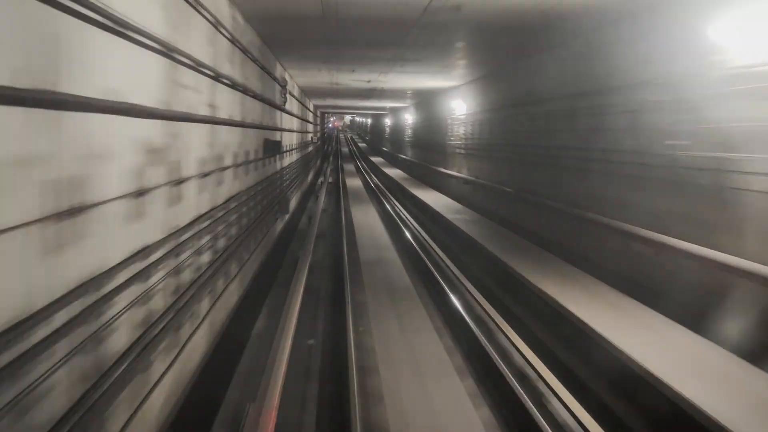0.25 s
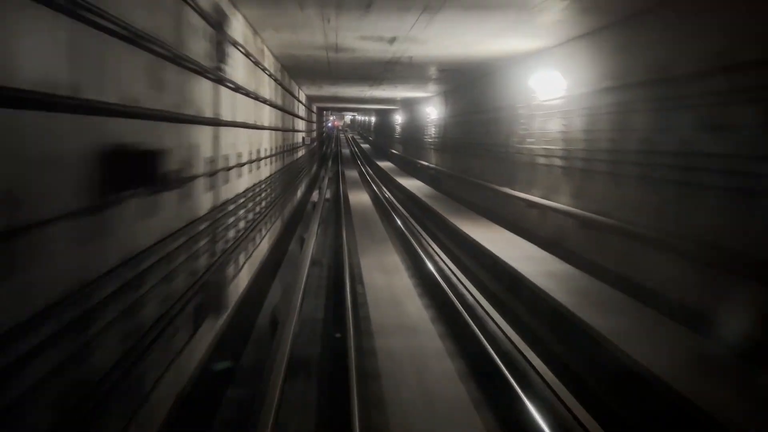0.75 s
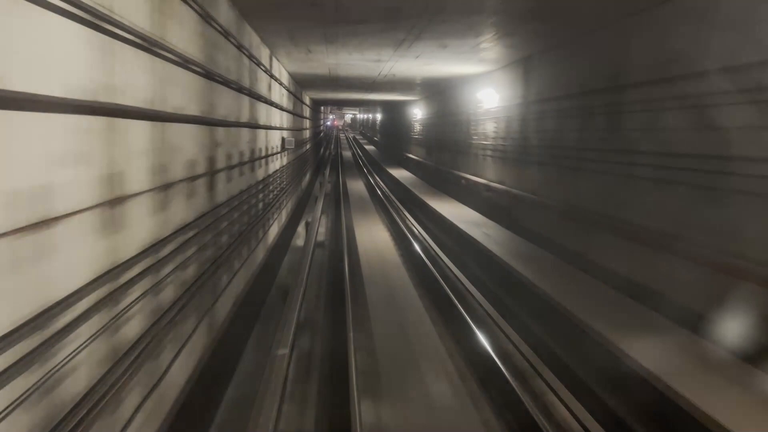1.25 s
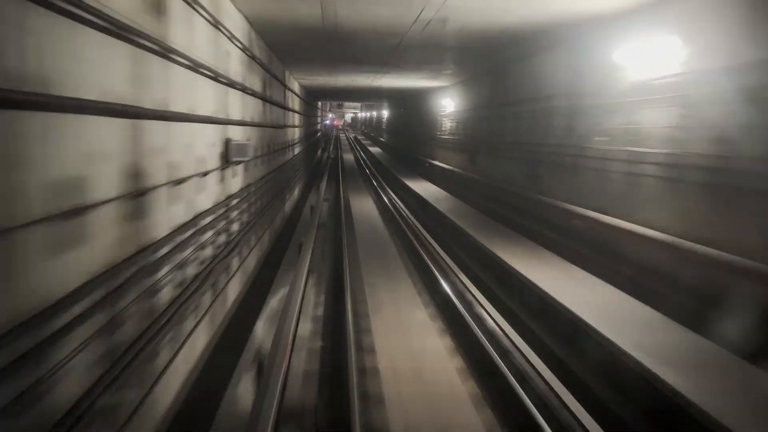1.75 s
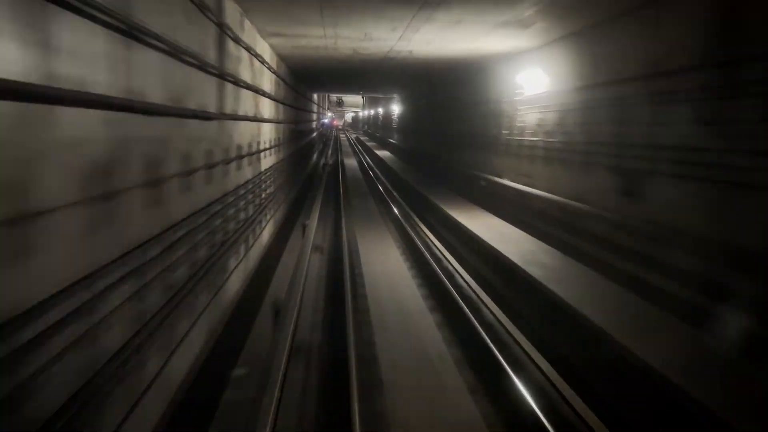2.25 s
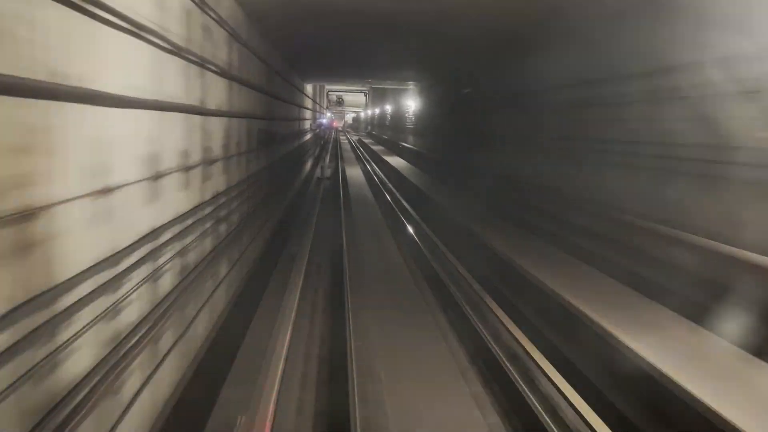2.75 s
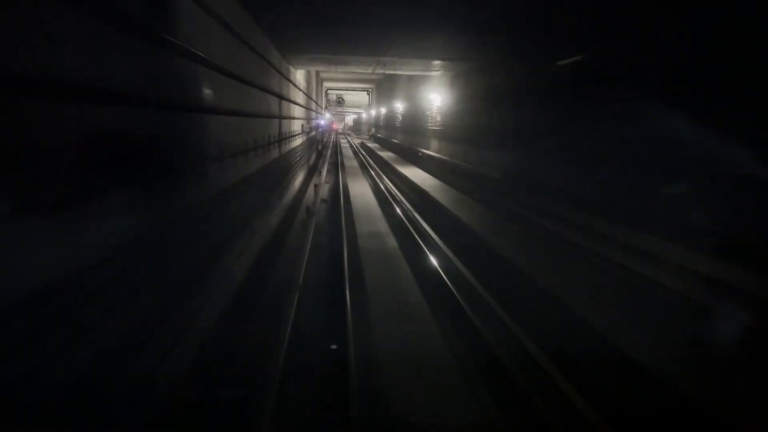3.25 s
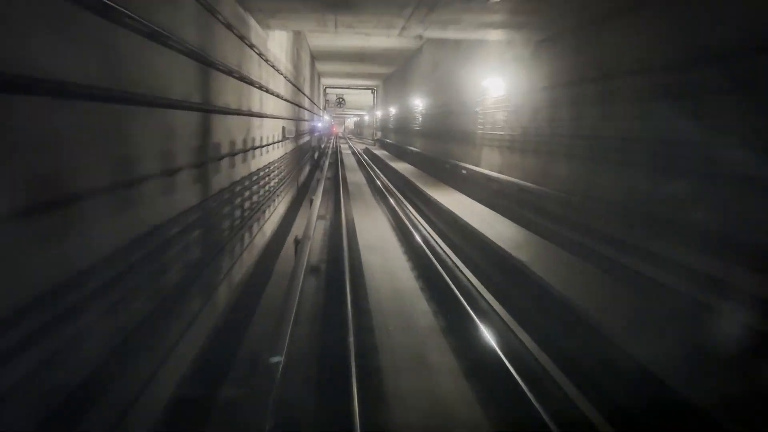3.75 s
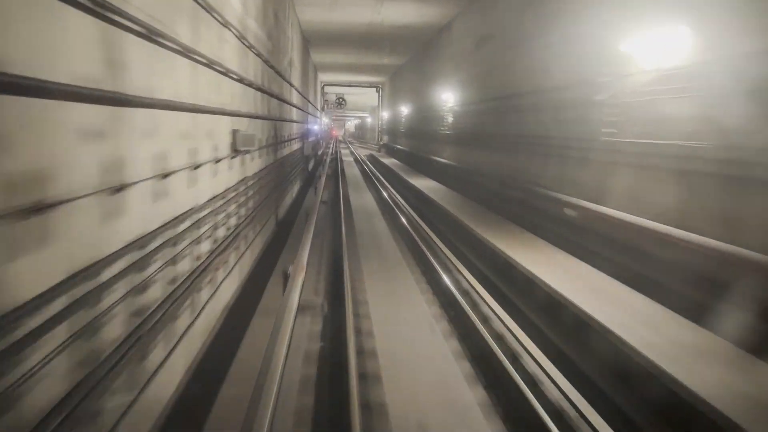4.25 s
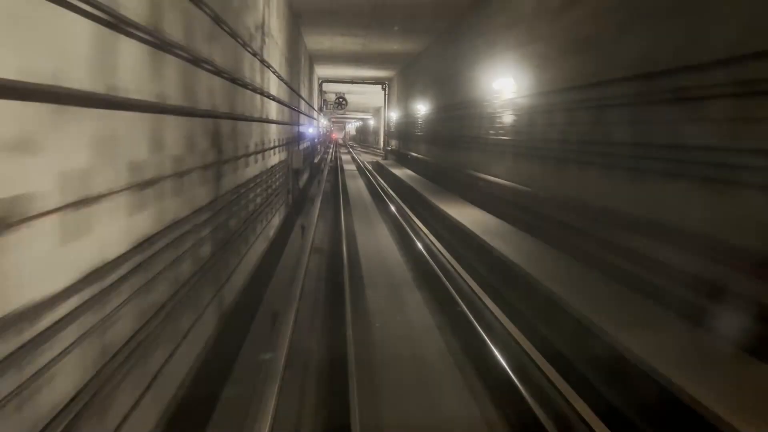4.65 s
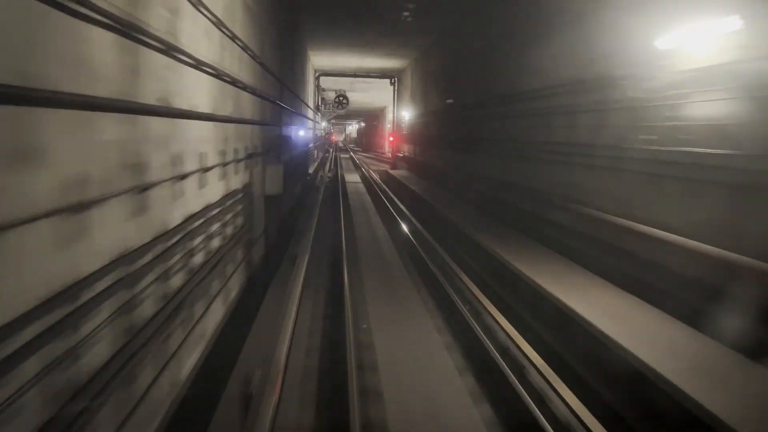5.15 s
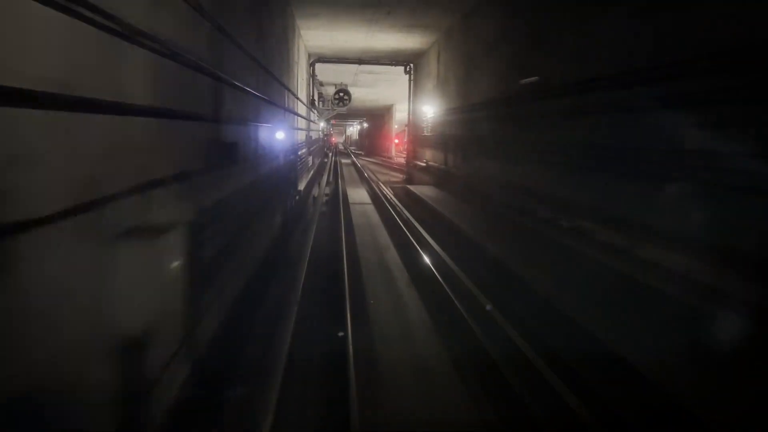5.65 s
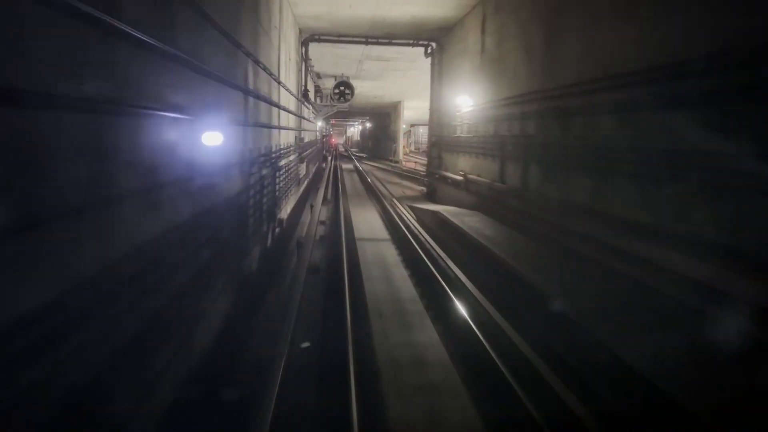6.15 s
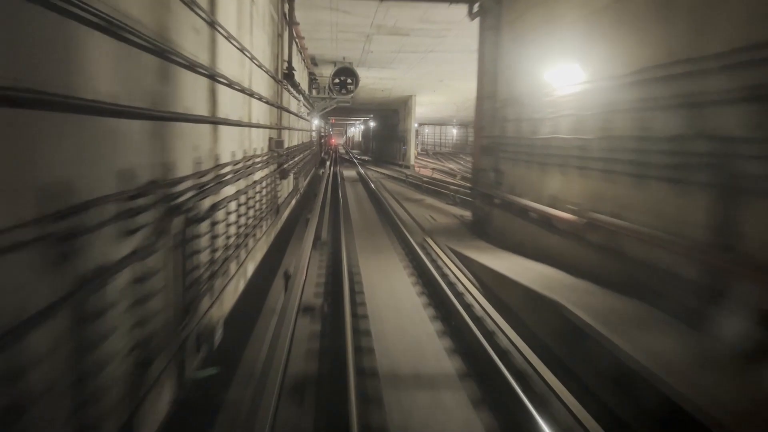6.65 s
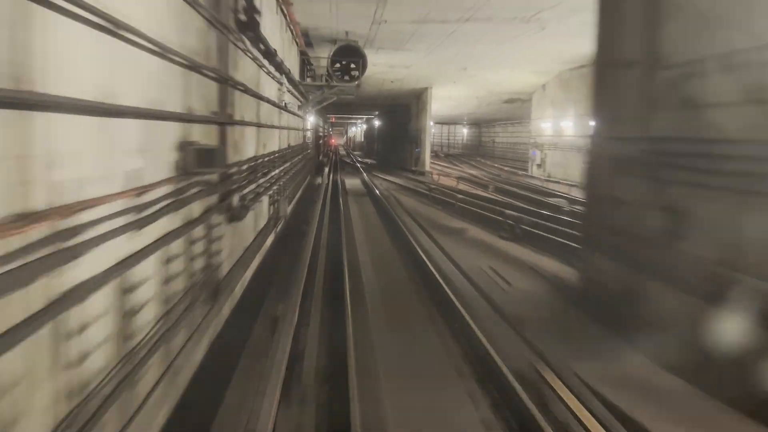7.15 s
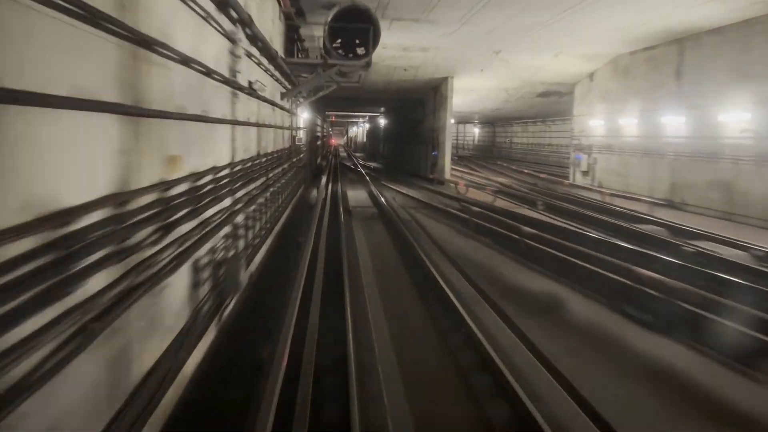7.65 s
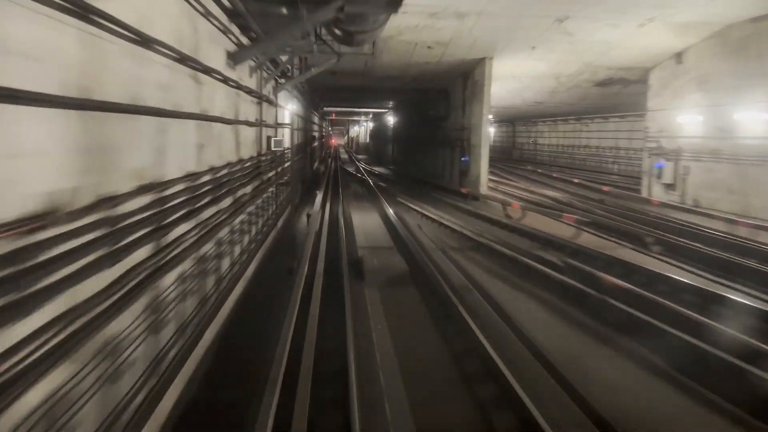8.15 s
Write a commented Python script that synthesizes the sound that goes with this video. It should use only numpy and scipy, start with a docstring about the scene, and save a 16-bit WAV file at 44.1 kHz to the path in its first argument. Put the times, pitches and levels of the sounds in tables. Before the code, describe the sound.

Inside a speeding subway cab, low rumbling and a wobbling wheel howl continue over hum and rushing air, sinking slightly near a junction.

```python
"""First comes a metro train's low rumble, wheel roar and hissing air, heard from the front cab in a tunnel.
Over it the wheels howl on rippled rail: a wavering note and a noisy band, sinking as the train slows.
A fan hums, two inverters whine and beat slowly, a motor tone comes and goes and the wheels ring in scrubs.
Bumps set off rattles and latch ticks, rough track knocks the body, and late on a cab panel sings.
Noise is shaped by spectra; notes are oscillators; ringing parts are narrow bands of random flutter."""
import sys
import numpy as np
from scipy import signal
from scipy.fft import rfft, irfft
from scipy.io import wavfile
from scipy.ndimage import uniform_filter1d

SR = 44100
rng = np.random.default_rng(int(sys.argv[2]) if len(sys.argv) > 2 else 0)


def dump_mix(stems):
    """Bounce the given channels to the path in sys.argv[1] as a 16-bit WAV at rate SR."""
    frames = np.atleast_2d(stems).T  # one column per channel
    limited = np.clip(frames, -1, 1)  # hard clip at full scale
    pcm = np.round(limited * 32767).astype(np.int16)
    wavfile.write(sys.argv[1], SR, pcm)


N = 370440
TIME = np.arange(N) / SR
FRAME, HOP = 4096, 1024  # samples, for noise built from spectrum frames
BINS = np.fft.rfftfreq(FRAME, 1 / SR)
FRAME_TIMES = np.arange(N // HOP + 3) * HOP / SR


def amp(db):
    """Decibels to gain."""
    return 10 ** (np.asarray(db) / 20)


def evened(x):
    """Scales to unit rms."""
    return x / np.sqrt(np.mean(abs(x) ** 2) + 1e-20)


def read(points, hz):
    """A spectrum's value, interpolated on a log-frequency axis."""
    f, value = np.transpose(points)
    return np.interp(np.log(hz + 1), np.log(f + 1), value)


def curve(rows, t=TIME):
    """The columns of a table as functions of time."""
    s, *columns = np.transpose(rows)
    return [np.interp(t, s, column) for column in columns]


def swell(s, half_length, t=TIME):
    """A smooth bell in time, peaking at one."""
    return np.exp(-((t - s) / half_length) ** 2)


def struck(s, rise, t60):
    """The envelope of one blow: a soft onset and an exponential decay."""
    age = np.maximum(TIME - s, 0)
    return amp(-60 * age / t60) * (1 - np.exp(-age / rise))


def flutter(width_hz, order=2):
    """Slow complex chance of unit rms: the envelope of a resonance driven by noise."""
    f = np.fft.fftfreq(N, 1 / SR)
    z = rng.standard_normal(N) + 1j * rng.standard_normal(N)
    lowpass = 1 / np.sqrt(1 + (2 * f / width_hz) ** (2 * order))
    return evened(np.fft.ifft(z * lowpass))


def ringing(modes):
    """Resonances kept sounding by random forces, at unit rms together."""
    total = 0
    for hz, width, db in modes:
        carrier = np.exp(2j * np.pi * hz * TIME)
        total = total + amp(db) * (flutter(width) * carrier).real
    return evened(total)


def lifts(modes, hz):
    """The dB that a set of resonances adds to a spectrum."""
    return sum(db / (1 + (2 * (hz - f) / width) ** 2) for f, width, db in modes)


# train speed: (time [s], speed [share of top speed])
TRAIN_SPEED = [(0, .988), (1.8, .995), (3.4, .992), (5, .948), (6, .91), (7, .875), (8.4, .83)]


def by_speed(top_db, slope_db):
    """Gain over time of a noise that grows as a power of the speed."""
    return amp(top_db + slope_db * np.log10(curve(TRAIN_SPEED)[0]))


# rumble spectrum, before levelling: (frequency [Hz], relative level [dB per Hz])
RUMBLE_SPECTRUM = [(15, -36.5), (30, -14.5), (46, 2.5), (56, -0.5), (68, -4), (90, -2), (118, 2),
                   (160, -2.5), (220, -3), (285, -10), (400, -13), (900, -81.5)]
# rumble growth: (level at top speed [dB], slope [dB per tenfold speed])
RUMBLE_GROWTH = (-29.5, 16)


def rumble(apart_db=-22):
    """Long waves from the floor reach both ports almost alike."""
    noise = rng.standard_normal((2, N))
    colour = amp(read(RUMBLE_SPECTRUM, np.fft.rfftfreq(N, 1 / SR)))
    shared, apart = irfft(rfft(noise) * colour, N)
    apart = amp(apart_db) * evened(np.gradient(apart))  # shorter waves differ more between the ports
    return by_speed(*RUMBLE_GROWTH) * (evened(shared) + np.array([apart, -apart]))


# match of left and right, clipped to -1..1: (frequency [Hz], correlation)
PORT_LIKENESS = [(330, 0.9), (400, 0.83), (475, 1.33), (545, 0.35), (580, 0.02), (615, 0.1), (665, 0.5),
                 (700, 0.94), (770, 0.15), (850, .25), (900, 0.56), (1020, 1.09), (1240, 0.74),
                 (1300, 0.28), (1600, 0.14), (1900, 0.25), (2100, 0.2), (2250, .2), (2700, 0.85),
                 (3300, -0.2), (6000, 0.26), (10000, 0.9)]
# phase by which left leads right: (frequency [Hz], lead [radians])
PORT_LEAD = [(500, 0.34), (590, -0.5), (635, 1.2), (710, 0), (810, 2.5), (930, 2.5), (1050, 2.5), (1380, 3),
             (1480, .1), (2200, 0), (2500, 1.5), (3000, 0.45), (7000, 1.5)]
# left minus right: (frequency [Hz], difference [dB])
PORT_BALANCE = [(280, 0), (365, -1.5), (500, -3.5), (595, -1), (622, -3.5), (670, 1.5), (750, -1.9),
                (787, 3.5), (830, 0.9), (930, 0), (1100, -1.5), (1230, -4), (1320, -1), (1700, .7),
                (1920, 3.5), (2200, -2), (2850, 2), (3500, 1), (5000, 7), (6500, 7.5), (8500, -1),
                (12000, 1)]


def cab_noise(field_db, patchy_db):
    """Noise with a drifting, patchy spectrum as it reaches two microphone ports."""
    a, b, c, d, patches = rng.standard_normal((5, len(FRAME_TIMES), len(BINS)))
    patches = uniform_filter1d(patches, size=8, axis=0)  # smooth over frames
    patches = evened(uniform_filter1d(patches, size=14, axis=1))  # smooth over bins
    same = np.clip(read(PORT_LIKENESS, BINS), -1, 1)
    left = a + 1j * b
    right = same * left + np.sqrt(1 - same ** 2) * (c + 1j * d)
    right = right * np.exp(-1j * read(PORT_LEAD, BINS))
    side = amp(read(PORT_BALANCE, BINS) / 2)
    frames = np.array([left * side, right / side]) * amp(field_db + patchy_db * patches)
    sound = signal.istft(frames.swapaxes(1, 2), nperseg=FRAME, noverlap=FRAME - HOP)[1]
    return evened(sound[:, :N])


# wheel and gear noise, sliding down with speed: (frequency at top speed [Hz], relative level [dB per Hz])
ROAR_SPECTRUM = [(500, 4), (750, -1), (900, -2.5), (1150, -10.5), (1600, -20.5), (2600, -21), (2950, -20.5),
                 (3250, -29.5), (3800, -64)]
# wheel and gear bands that slide with speed: (centre at top speed [Hz], width at top speed [Hz], lift [dB])
SLIDING_BANDS = [(755, 85, 5.5), (856, 19, 2.5), (920, 16, 3.5), (1615, 55, 6.5), (3000, 1100, 1.5)]
# what the cab lets in: (frequency [Hz], gain [dB])
CAB_PASSAGE = [(250, -37), (330, 2), (420, -2.5), (525, -4.5), (620, -0.5), (740, -2.5), (1000, -1.5),
               (1500, -2.5), (1830, -6.5), (2170, -2), (2500, -4.5), (2750, -10), (3000, -6)]
# resonances of cab panels and air space: (centre [Hz], width [Hz], lift [dB])
CAB_RESONANCES = [(446, 22, 4), (581, 25, 5.5), (622.5, 24, 5), (704, 51, 5), (915, 40, 1.5),
                  (985, 30, 3.5), (1110, 30, 5), (1230, 40, 2), (2093, 88, 6), (2260, 15, 5),
                  (4950, 200, 0.5)]
# rail stretches that swell one resonance: (time [s], half length [s], centre [Hz], width [Hz], lift [dB])
RAIL_SWELLS = [(1.004, 1, 1123, 199.8, 2), (1.249, 0.64, 767, 168, 3.5), (2.2, 0.8, 710, 150, 2),
               (2.301, 0.54, 2870, 110, 9.5), (3.295, .6, 1580, 70, 4), (3.702, .8, 3070, 134.4, 1.5),
               (6.097, 0.76, 2510, 220, 7.5), (5.7, 0.46, 1323, 160, 2.5), (8.2, 0.39, 1300, 248, 1.5),
               (7, 0.57, 1010, 60, 5.5), (6.302, .6, 668, 69.8, 3.5), (7.6, .25, 590, 110, 1),
               (8.001, 1.1, 951, 130.3, 8)]
# the tunnel widens at a junction and gradually throws back less low roar:
# (start [s], time of full change [s], full change [dB], centre [Hz], width [Hz])
TUNNEL_WIDENING = (6.5, 9, -3, 679.5, 331)
# spectrum of the passing air: (frequency [Hz], relative level [dB per Hz])
HISS_SPECTRUM = [(1500, -10.5), (3000, 7.5), (4200, 1), (4900, 2), (5300, -1.5), (6000, -2), (7000, -8),
                 (8200, -8.5), (9500, -17), (11000, -41.5), (15000, -54.5)]
# growth of roar and of hiss, before the walls: (level at top speed [dB], slope [dB per tenfold speed])
ROAR_GROWTH = (-25, 9.5)
HISS_GROWTH = (-54.5, 34)
# changing tunnel walls throw back more or less of both: (time [s], gain [dB])
WALL_GAIN = [(0, -0.5), (2.3, 0.03), (3.6, -0.3), (4.5, -0.4), (5.05, -1), (5.7, -0.5), (6.6, 0.1),
             (7.6, 0.6), (8.1, -1), (8.4, -1.5)]


def rolling():
    """Wheel roar through the cab's resonances, and air hissing past the window."""
    top_speed_hz = BINS / curve(TRAIN_SPEED, FRAME_TIMES)[0][:, None]
    field = read(ROAR_SPECTRUM, top_speed_hz) + lifts(SLIDING_BANDS, top_speed_hz)
    field = field + read(CAB_PASSAGE, BINS) + lifts(CAB_RESONANCES, BINS)
    for s, half_length, *resonance in RAIL_SWELLS:
        field = field + swell(s, half_length, FRAME_TIMES[:, None]) * lifts([resonance], BINS)
    start, end, db, hz, width = TUNNEL_WIDENING
    widened = np.interp(FRAME_TIMES, [start, end], [0, 1])[:, None]
    field = field + widened * lifts([(hz, width, db)], BINS)
    roar = by_speed(*ROAR_GROWTH) * cab_noise(field, patchy_db=1.5)
    hiss = by_speed(*HISS_GROWTH) * cab_noise(read(HISS_SPECTRUM, BINS), patchy_db=1.5)
    return amp(curve(WALL_GAIN)[0]) * (roar + hiss)


# steady howl, before patches, dips and lean:
# (time [s], pitch [Hz], noisy band level [dB], clean note level [dB])
HOWL_COURSE = [(0, 368, -26, -34), (1.4, 371, -28, -36.5), (2.6, 366.3, -27, -36), (3.9, 367.3, -26, -33),
               (5.5, 357.8, -27, -35.5), (6.3, 344.6, -28, -33.5), (7.6, 340.6, -31, -29),
               (8.4, 329.9, -35.5, -43.5)]
# evenly rippled rail, where the clean note grows: (start [s], length [s], added note level [dB], pitch [Hz])
RIPPLE_PATCHES = [(0.213, 0.078, -21, 366.5), (0.851, 0.027, -21.5, 372.5), (.886, .033, -19, 372.5),
                  (.936, 0.021, -16, 373.5), (1.065, 0.032, -19.5, 375.8), (1.129, .08, -24.5, 371.6),
                  (1.395, 0.037, -21.5, 370), (1.433, 0.069, -20, 369), (1.787, 0.025, -20, 380.8),
                  (1.85, 0.017, -19, 379.3), (2.107, 0.037, -19, 368.6), (2.265, 0.051, -21, 363.8),
                  (2.381, 0.089, -17.5, 362.8), (2.536, 0.05, -21, 359.5), (2.709, 0.024, -16.5, 367),
                  (2.753, 0.056, -17.5, 367.5), (2.866, 0.086, -25.5, 361.6), (2.999, 0.042, -22.5, 375.7),
                  (3.076, 0.027, -21.5, 362.4), (3.166, 0.025, -24, 371), (3.223, 0.031, -23.5, 363.3),
                  (3.433, 0.054, -19, 367), (3.523, 0.027, -25, 383), (3.863, .03, -24, 372),
                  (3.97, 0.028, -18, 367.6), (4.016, 0.034, -23.5, 365.6), (4.061, 0.036, -19.5, 366),
                  (4.121, 0.026, -21, 367.6), (4.17, 0.046, -19, 365.5), (4.358, 0.035, -21, 358.8),
                  (4.513, 0.1, -19.5, 367), (4.628, 0.035, -14, 363), (4.662, .19, -22, 366.7),
                  (4.867, 0.055, -18.5, 365.8), (4.978, 0.072, -22.5, 362.7), (5.191, .04, -22.5, 371),
                  (5.26, 0.047, -22, 358), (5.748, 0.026, -22, 365.8), (5.931, .046, -22, 361),
                  (6.02, .05, -20.5, 359), (6.252, 0.036, -21.5, 347), (6.49, 0.023, -23, 344),
                  (6.678, 0.055, -25, 357), (6.809, 0.064, -25, 349.2)]
RIPPLE_EDGE_S = 0.012  # time a wheel takes to run onto or off a patch
# smooth rail, where the howl drops out: (time [s], half length [s], dip [dB])
SMOOTH_STRETCHES = [(0.45, 0.017, -14), (0.634, 0.016, -14), (0.74, 0.031, -19), (1.973, 0.016, -11),
                    (2.663, 0.0089, -8), (2.982, 0.017, -16), (3.059, 0.012, -7), (3.828, .016, -11),
                    (4.266, 0.056, -8), (4.964, 0.014, -11), (5.082, .012, -5), (5.897, .014, -9),
                    (6.179, 0.013, -4), (7.174, 0.042, -5.5), (7.62, 0.023, -6)]


def howl(band_hz=48, waver_hz=12, waver=0.22, lean_db=1.75, evenness=0.65, ordered_db=-6,
         octave_db=-39, octave_hz=40):
    """Regular rail ripple makes the wheels sing a note, uneven ripple a noisy band; a faint octave follows."""
    hz, band_db, note_db = curve(HOWL_COURSE)
    power, note_hz, ordered = amp(note_db) ** 2, hz, 0
    for start, length, db, patch_hz in RIPPLE_PATCHES:
        inside_s = np.minimum(TIME - start, start + length - TIME)
        on_patch = np.clip(.5 + inside_s / RIPPLE_EDGE_S, 0, 1)
        power = power + amp(db) ** 2 * on_patch
        note_hz = note_hz + (patch_hz - hz) * on_patch
        ordered = ordered + on_patch
    note_phase = 2 * np.pi * np.cumsum(note_hz) / SR + waver * flutter(waver_hz).real
    note = np.sqrt(power) * np.exp(1j * note_phase)
    band = flutter(band_hz, order=3)
    local_power = uniform_filter1d(abs(band) ** 2, size=6000)
    band = evened(band / local_power ** (evenness / 2))  # softens the band's own slow swells
    carrier = np.exp(2j * np.pi * np.cumsum(hz) / SR)
    wave = note + amp(band_db + ordered_db * ordered) * band * carrier  # patches thin the band
    dips_db = sum(db * swell(s, half_length) for s, half_length, db in SMOOTH_STRETCHES)
    main = np.sqrt(2) * amp(dips_db) * wave.real * amp([[-lean_db], [lean_db]])
    octave = amp(octave_db) * evened((amp(band_db) * flutter(octave_hz) * carrier ** 2).real)
    return main + octave


# fan and cab tones: (frequency [Hz], left level [dB], right level [dB])
FAN_AND_CAB_TONES = [(143.4, -36.5, -36), (140.5, -47.5, -48.5), (47.3, -46.5, -47)]
# inverter sidebands and overtones: (frequency [Hz], left level [dB], right level [dB])
INVERTER_SIDEBANDS = [(2400.9, -67, -75), (3728.7, -74, -86), (4016, -78, -82), (4012.7, -83, -84),
                      (7697, -91, -93), (7984, -91, -93)]


def hums():
    """Steady lines from fan, cab and inverters, each wavering slightly in level and phase."""
    out = np.zeros((2, N))
    for hz, left_db, right_db in FAN_AND_CAB_TONES + INVERTER_SIDEBANDS:
        wave = np.exp(2j * np.pi * hz * TIME) * (1 + 0.17 * flutter(2.1))
        out += amp([[left_db], [right_db]]) * evened(wave.real)
    return out


# whine of the inverter pair, before its beating: (time [s], left level [dB], right level [dB])
WHINE_LEVELS = [(0, -63.5, -64), (.8, -66.5, -65), (1.25, -61.5, -60), (1.6, -58.3, -62), (2.2, -62, -62),
                (3.05, -60.5, -62), (3.55, -64.5, -61.5), (4, -61.5, -61.5), (4.75, -63.5, -59.5),
                (5.6, -59, -61), (6.3, -59.5, -61), (6.8, -64, -62), (7.3, -64.5, -59.5), (7.9, -59.5, -58),
                (8.15, -58, -57), (8.4, -58, -58.5)]


def inverters():
    """Two inverters switch at almost the same rate, so their whine swells every two seconds."""
    whine_hz, beat_hz = 3872.1, .497
    second, loudest_s = .7, 1.37  # second inverter's share of the first; a moment when both align
    pair = 1 + second * np.exp(2j * np.pi * beat_hz * (TIME - loudest_s)) + .1 * flutter(14)
    whine = (pair * np.exp(2j * np.pi * whine_hz * TIME)).real
    return amp(curve(WHINE_LEVELS)) * evened(whine)


# traction motor tone, before its lean to the right: (time [s], level [dB])
MOTOR_LEVEL = [(0, -46), (5.7, -46), (6.0, -31), (6.2, -30.5), (6.45, -44), (6.7, -41), (7.1, -46),
               (7.5, -36), (7.9, -37), (8.4, -46)]


def motor():
    """A traction motor tone whose pitch follows the speed."""
    top_hz = 474  # pitch at top speed
    turns = np.cumsum(top_hz * curve(TRAIN_SPEED)[0]) / SR
    wave = np.exp(2j * np.pi * turns) * (1 + 0.17 * flutter(6.8))
    return amp(curve(MOTOR_LEVEL)[0]) * evened(wave.real) * amp([[-1.1], [1.1]])


# wheels scrubbing the rail: (time [s], half length [s], level [dB])
SCRUB_SWELLS = [(0.038, 0.048, -47), (0.66, .065, -47.5), (.82, .06, -48), (1.077, 0.12, -48),
                (1.638, .04, -53), (1.828, .06, -48), (2.003, .05, -52), (2.118, 0.055, -55),
                (2.59, 0.089, -55.5), (2.817, 0.037, -46.5), (2.91, 0.037, -48), (3.017, 0.055, -50),
                (3.35, 0.24, -51.5), (4.063, 0.035, -46.5), (4.245, .05, -48.5), (4.419, 0.11, -53.5),
                (4.61, .04, -52.5), (4.78, .04, -52), (5.712, .04, -63)]
# high wheel modes: (frequency [Hz], width [Hz], relative level [dB])
WHEEL_MODES = [(2070, 51, -6), (2190, 54, -0.5), (2350, 70, -5.5)]


def scrubs():
    """Short, fluttering swells of the wheels' high ring, independent at the two ports."""
    envelope = sum(amp(db) * swell(s, half_length) for s, half_length, db in SCRUB_SWELLS)
    return envelope * np.array([ringing(WHEEL_MODES), ringing(WHEEL_MODES)])


# loose fittings set off by bumps: (time [s], level before onset and lean [dB], rise [s], t60 [s])
RATTLE_BURSTS = [(.996, -59, 0.0058, 0.45), (1.105, -70, .008, 0.93), (1.72, -68, .02, .5),
                 (2.06, -66, .03, 0.89), (2.14, -62, .03, 0.42), (2.188, -62, 0.0051, 0.24),
                 (2.312, -54.5, 0.006, 0.42), (3.65, -65, .03, 0.89), (3.92, -67, 0.01, 0.28),
                 (4.226, -55.5, .004, 0.38), (4.295, -68, 0.0031, 0.22), (4.597, -64, .003, 0.2),
                 (4.626, -61, .002, 0.19), (5.64, -62, 0.003, .15), (6.4, -70, 0.0099, 0.33),
                 (6.915, -67, 0.003, 0.14), (7.73, -63, .003, .12)]
# rattle spectrum: (frequency [Hz], relative level [dB per Hz])
RATTLE_SPECTRUM = [(2000, -24), (4000, -7), (5300, -1), (8500, -2), (10000, -9), (12000, -5), (13500, -17),
                   (15500, -23)]


def rattles(grain_db=3.5, lean_db=0.5):
    """Each bump sets off a quick, dying chatter of tiny metal contacts: grainy, filtered noise."""
    envelope = sum(amp(db) * struck(s, rise, t60) for s, db, rise, t60 in RATTLE_BURSTS)
    contacts = rng.standard_normal((2, N)) * amp(grain_db * flutter(200).real)
    colour = amp(read(RATTLE_SPECTRUM, np.fft.rfftfreq(N, 1 / SR)))
    chatter = irfft(rfft(contacts) * colour, N)
    return envelope * evened(chatter) * amp([[lean_db], [-lean_db]])


# sharp ticks of a loose latch: (time [s], level before onset and lean [dB])
LATCH_TICKS = [(.999, -53), (1.005, -55), (1.013, -53), (1.018, -53), (1.042, -53), (1.105, -52),
               (2.19, -50), (2.314, -50), (2.328, -52), (2.355, -53), (2.392, -55), (4.2293, -46),
               (4.599, -54), (4.6265, -51)]
# latch modes: (frequency [Hz], width [Hz], relative level [dB])
LATCH_MODES = [(5300, 450, 4.5), (6300, 600, 4.5), (7200, 500, -3), (8350, 600, -0.5), (11800, 700, -10)]


def ticks(rise=.0005, t60=0.032, lean_db=2.5):
    """Hard contacts of a loose latch stand out as short metal ticks."""
    envelope = sum(amp(db) * struck(s, rise, t60) for s, db in LATCH_TICKS)
    ring = np.array([ringing(LATCH_MODES), ringing(LATCH_MODES)])
    return envelope * ring * amp([[lean_db], [-lean_db]])


# the bogie knocks over a rough stretch: (time [s], level before onset [dB])
BOGIE_KNOCKS = [(2.02, -25), (2.1, -22.5), (2.19, -22), (2.28, -24.5), (2.36, -31)]
# car body modes: (frequency [Hz], width [Hz], relative level [dB])
BODY_MODES = [(51.9, 28, -2.5), (89, 36, 1.5), (114.8, 35, -3), (169.8, 36, -2.5), (235.6, 73, -6)]


def jolt(rise=0.017, t60=0.75):
    """Knocks from a rough stretch of track shake the car body's low modes; their powers add."""
    power = sum((amp(db) * struck(s, rise, t60)) ** 2 for s, db in BOGIE_KNOCKS)
    return np.sqrt(power) * ringing(BODY_MODES)


# slowing gears ring one panel: (time [s], half length [s], level before lean [dB])
PANEL_NOTES = [(7.144, .2, -33), (7.648, .12, -41.5), (8.301, 0.1, -41.5)]
# the panel's mode: (frequency [Hz], width [Hz], relative level [dB])
PANEL_MODE = [(640, 6, 0)]


def panel():
    """One cab panel sings a narrow note in swells as the slowing gears slide through its pitch."""
    envelope = sum(amp(db) * swell(s, half_length) for s, half_length, db in PANEL_NOTES)
    return envelope * ringing(PANEL_MODE) * amp([[-2], [2]])


def scene():
    """Everything heard in the cab."""
    running = rumble() + rolling() + howl()
    machines = hums() + inverters() + motor()
    events = scrubs() + rattles() + ticks() + jolt() + panel()
    return running + machines + events


def record(dry):
    """A steep low-pass at 15.7 kHz sets the band limit."""
    lowpass = signal.firwin(511, 15700, window=("kaiser", 9), fs=SR)
    return signal.oaconvolve(dry, lowpass[None], "same")


dry = scene()
out = record(dry)
dump_mix(out)
```